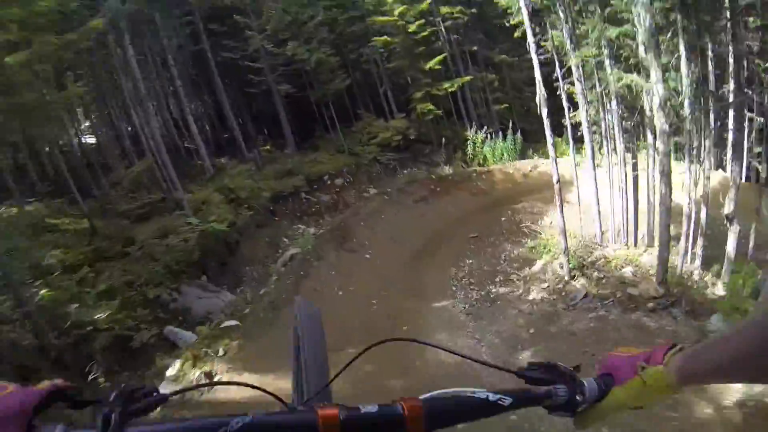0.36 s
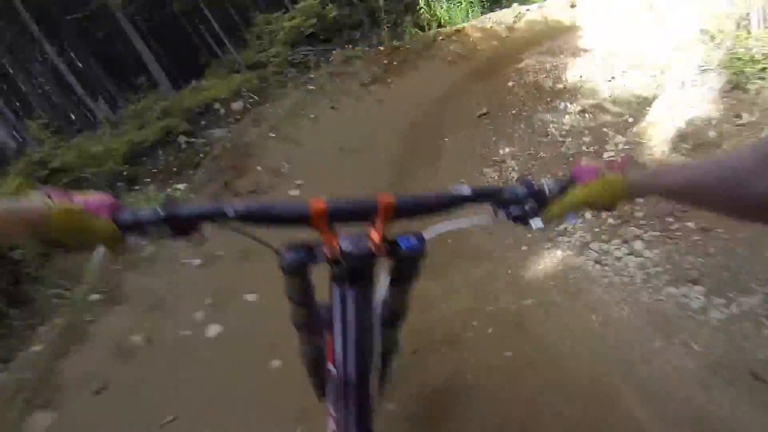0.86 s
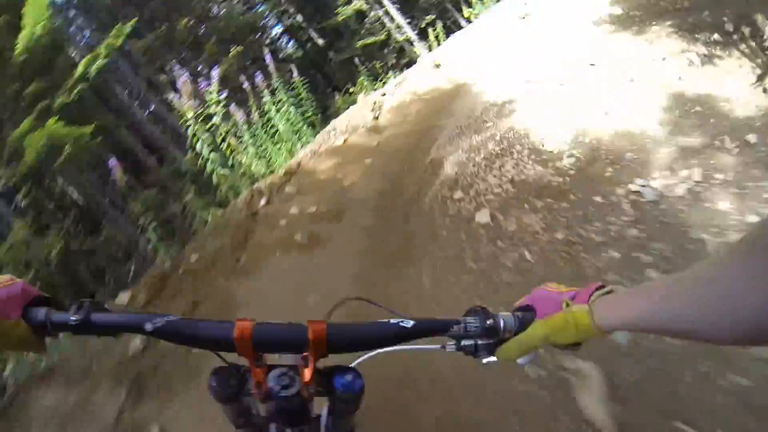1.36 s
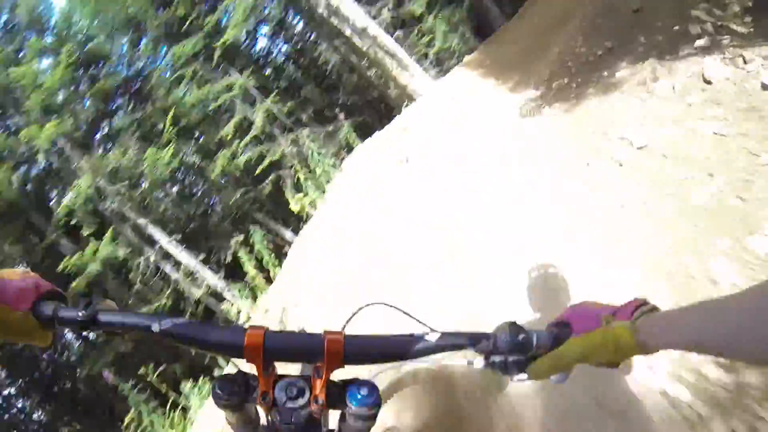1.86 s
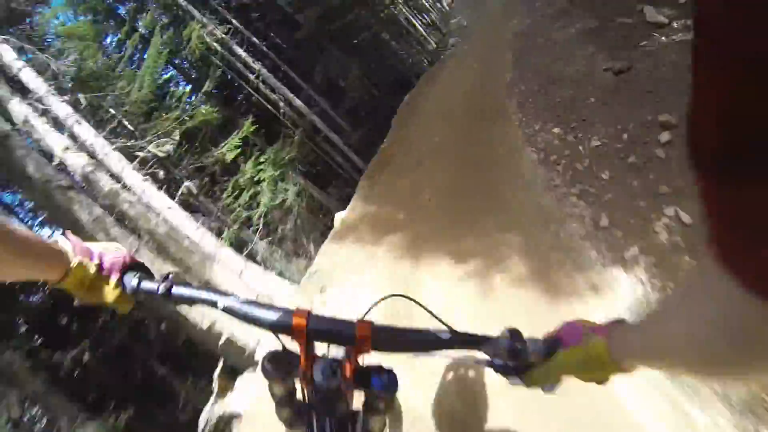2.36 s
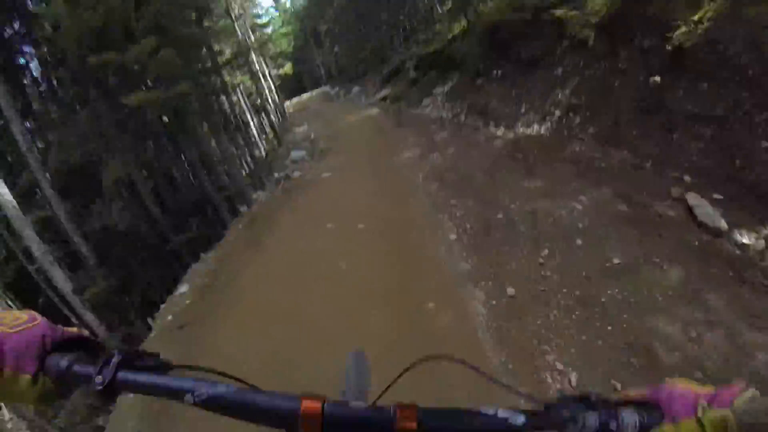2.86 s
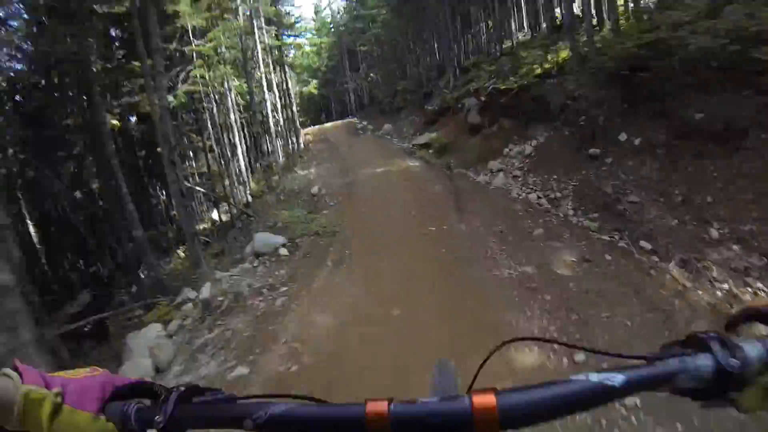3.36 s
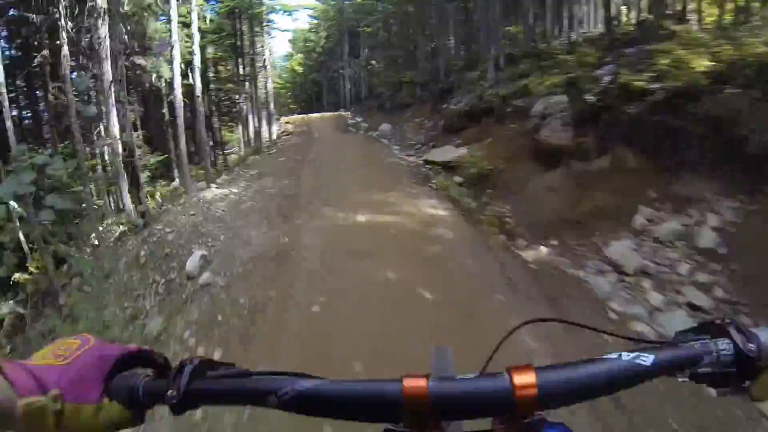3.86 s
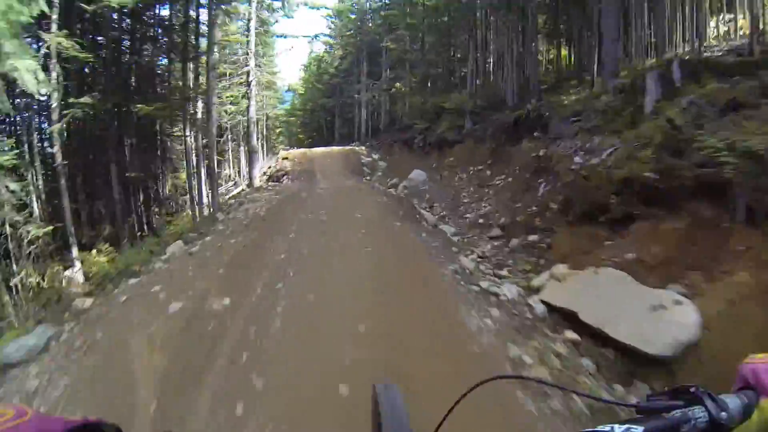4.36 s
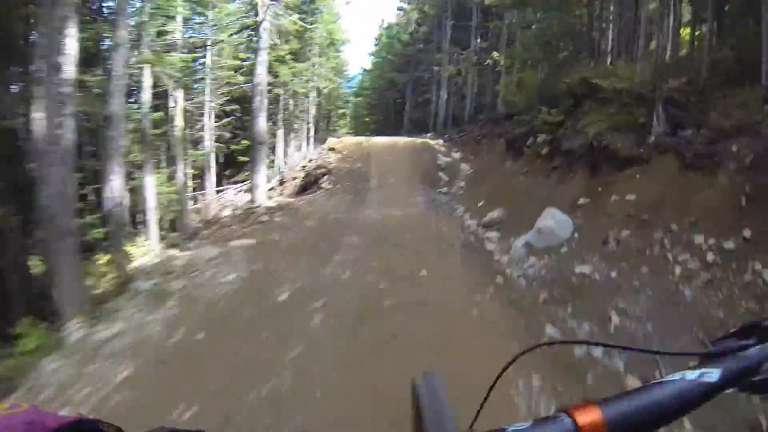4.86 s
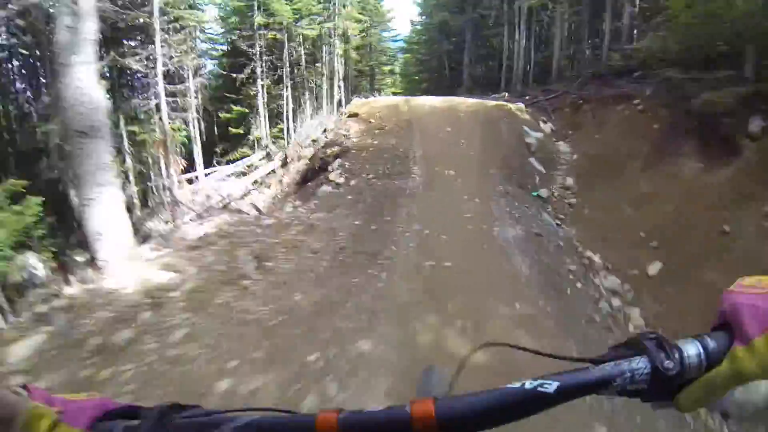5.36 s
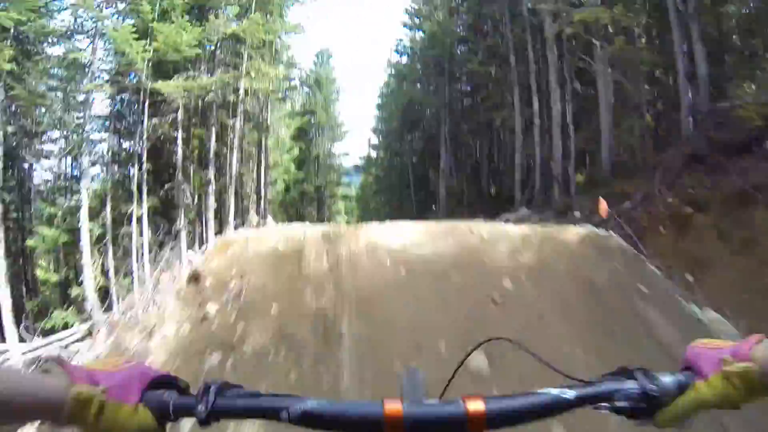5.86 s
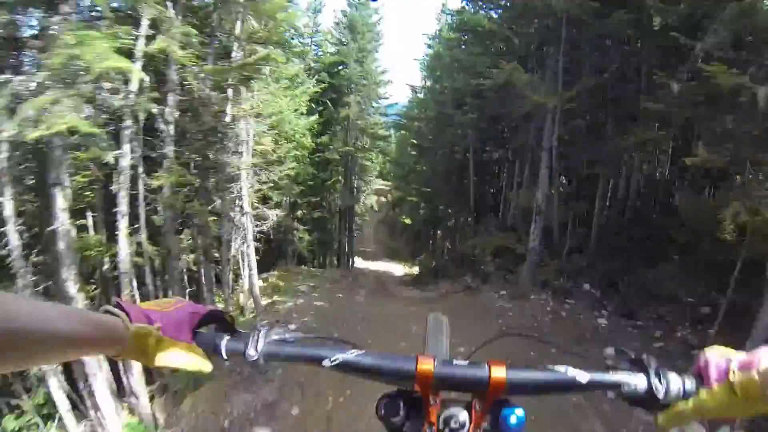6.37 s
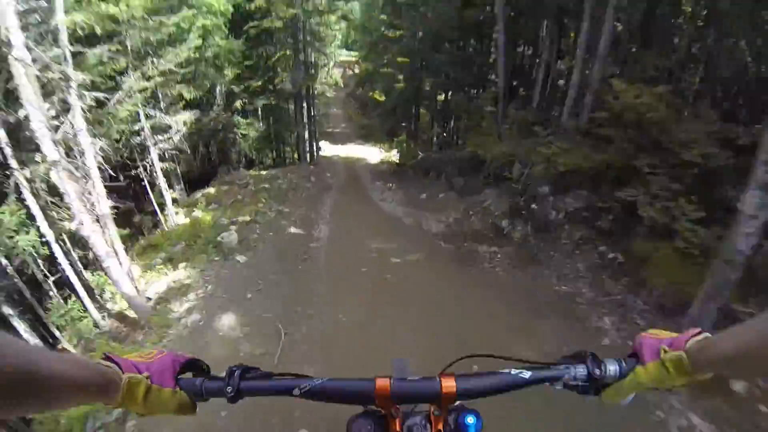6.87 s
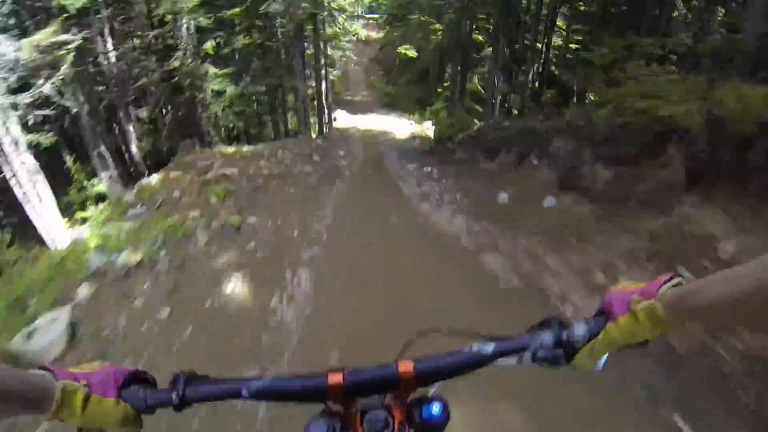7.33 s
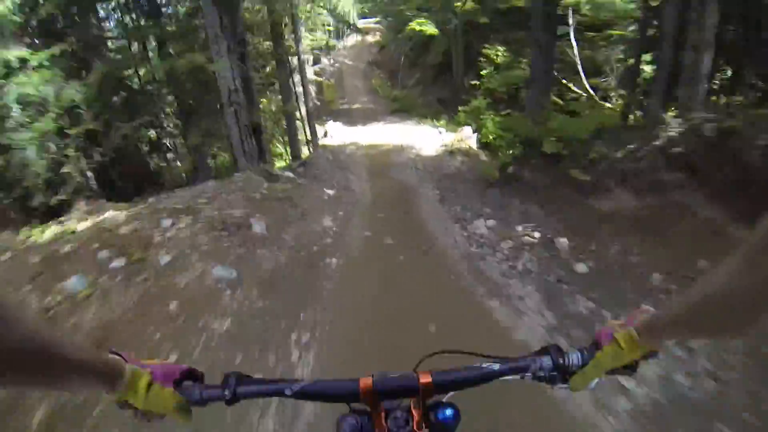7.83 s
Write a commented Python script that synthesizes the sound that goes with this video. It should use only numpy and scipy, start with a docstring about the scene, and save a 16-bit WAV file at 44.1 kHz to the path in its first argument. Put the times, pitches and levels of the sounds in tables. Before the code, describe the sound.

A close, enclosed microphone catches low wind thumps, gritty rolling tyres, a dusty hiss through a turn, clustered frame knocks, then a jump and landing.

```python
"""A mountain bike rolls fast down a dirt trail, heard from a microphone in a sealed case on the rider's chest.
It opens in a jump, in head wind: coloured noise that buffets and thumps the case and rushes past it.
At 0.6 s the wheels land: tyre noise drones, roars and grinds, while frame modes ring to knocks and small stones;
dust hisses in a banked turn, then knocks crowd together near 2.6 s. From 6.3 s a second jump leaves the wind
and dull jerks of the case, damped low tones with a puff; at 7.1 s the bike lands and rolls on."""
import sys
import numpy as np
from scipy import signal
from scipy.fft import rfft, irfft, next_fast_len
from scipy.io import wavfile
from scipy.ndimage import uniform_filter1d, map_coordinates

SR = 44100
rng = np.random.default_rng(int(sys.argv[2]) if len(sys.argv) > 2 else 0)


def pcm_store(signal):
    """Save signal as 16-bit PCM."""
    levels = np.round(np.clip(np.atleast_2d(signal), -1, 1) * 32767)
    wavfile.write(sys.argv[1], SR, levels.astype(np.int16).T)


def voltage_ratio(level):
    """Linear amplitude factor for a level in decibels (scalar or array-like)."""
    return 10 ** (np.asarray(level, float) / 20)


N = 351477  # samples in the scene
SPAN = 2048  # samples given to each short event

# head wind on the case: t/s, buffet level/dB, thump level/dB
WIND = [(0.0, -32, -35), (0.26, -42, -53.5), (0.69, -26.5, -24.5), (1.37, -31.5, -42.5), (1.46, -30, -41),
        (1.93, -29, -33.5), (2.71, -33.5, -40), (3.02, -27.5, -25), (3.55, -34, -41.5), (3.66, -30, -31),
        (3.97, -34, -42), (4.04, -29.5, -32), (4.24, -32.5, -40), (5.35, -29.5, -35.5), (5.44, -22.5, -28),
        (5.51, -34, -42.5), (5.68, -26, -30), (5.7, -35, -33), (6.19, -34.5, -39.5), (6.24, -18.5, -34.5),
        (6.37, -28, -33.5), (6.59, -25.5, -34.5), (6.68, -37.5, -44), (7.06, -33, -34.5),
        (7.81, -27.5, -30), (7.93, -21.5, -31), (7.97, -39, -35)]


def along(points, hz):
    """(Hz, value) points read on a log frequency axis."""
    f, value = np.transpose(points)
    return np.interp(np.log(hz + 1), np.log(f + 1), value)


def unit(x):
    """Scaled to rms 1."""
    return x / np.sqrt(np.mean(x ** 2, axis=-1, keepdims=True) + 1e-20)


def controls(rows):
    """The columns after the time, a value per sample."""
    s, *columns = np.transpose(rows)
    return [np.interp(np.arange(N) / SR, s, column) for column in columns]


def wobble(rate):
    """A smooth random curve, rate knots a second."""
    knots = rng.standard_normal(N // 100 + 9)
    return map_coordinates(knots, [np.arange(N) * rate / SR])


EDDIES = wobble(24)  # quick swells shared by wind and tyres


def rush(spectrum, patchy_db, swell_db):
    """Noise with patches of random gain rides on quick swells, is coloured by source and case, then set to rms 1."""
    # cavity resonances of the case, heard on every rushing sound: f/Hz, width/Hz, lift/dB
    cavity = [(1320, 660, -3), (1920, 160, 3), (3450, 120, -4.5), (3920, 87, -7.5), (3920, 200, 3),
              (9380, 580, 4)]
    z = signal.stft(rng.standard_normal(N), nperseg=512)[2]
    field = uniform_filter1d(rng.standard_normal(z.shape), size=6, axis=0)
    field = uniform_filter1d(field, size=8, axis=1)
    patchy = signal.istft(z * voltage_ratio(patchy_db * field / field.std()), nperseg=512)[1][:N]
    m = next_fast_len(N + SPAN)
    f = np.fft.rfftfreq(m, 1 / SR)
    lift_db = sum(db / (1 + (2 * (f - hz) / width) ** 2) for hz, width, db in cavity)
    coloured = irfft(rfft(patchy * voltage_ratio(swell_db), m) * voltage_ratio(along(spectrum, f) + lift_db), m)
    return unit(coloured[:N])


def wind():
    """Eddies of head wind press on the case: slow buffets, faster thumps, a thin steady rush past its edges."""
    # thin rush past the case, bare in the two jumps, one list for each: t/s, level/dB
    edge_level = [
        [(0.0, -59.5), (0.33, -55.5), (0.54, -51.5)],
        [(6.25, -49.5), (6.604, -51), (6.834, -51), (7.03, -49)],
    ]
    # colour of each layer before the case resonances: f/Hz, relative level/dB
    buffet_colour = [(7.1, -7), (12, -7), (38, 4.5), (110, -7), (140, -10.5), (240, -120)]
    thump_colour = [(41, -36.5), (70, 0), (211, -6.5), (400, -19.5), (520, -36.5), (880, -120)]
    edge_colour = [(260, -21.5), (450, 1.5), (793, -4.5), (867, -2.5), (1320, -10.5), (1910, -13.5),
                   (2900, -26), (4030, -20.5), (4410, -32.5), (6120, -43.5), (9430, -43), (10600, -46.5),
                   (15900, -51.5)]
    buffet_db, thump_db = controls(WIND)
    edge_db = controls(np.concatenate(edge_level))[0]
    buffet = voltage_ratio(buffet_db) * rush(buffet_colour, patchy_db=1.5, swell_db=2.16 * wobble(13))
    thump = voltage_ratio(thump_db) * rush(thump_colour, patchy_db=0.5, swell_db=2.4 * EDDIES + 1.2 * wobble(9))
    edge = voltage_ratio(edge_db) * rush(edge_colour, patchy_db=0.96, swell_db=0.42 * EDDIES)
    return buffet + thump + edge


def jolts():
    """The case jerks on its harness: a dull push of two damped tones and a puff, dying 60 dB in 20 ms."""
    # jerks: t/s, relative level/dB, f/Hz of the lower tone
    jerks = [(0.117, -26, 108), (0.585, -15.5, 107), (0.692, -19, 167), (0.748, -19.5, 218),
             (2.884, -24, 201), (3.03, -19, 137), (4.75, -20, 110), (5.19, -22.5, 98), (5.429, -19, 100),
             (6.274, -23, 103), (6.394, -14.5, 127), (6.504, -22, 131), (6.707, -25, 114),
             (7.294, -22.5, 102), (7.87, -18, 70)]
    out, t = np.zeros(N + SPAN), np.arange(SPAN) / SR
    puff_window = np.hanning(80) / 80 * 2  # smooths noise over 80 samples
    for s, db, hz in jerks:
        push = np.sin(2 * np.pi * hz * t)
        push += 0.36 * np.sin(2 * np.pi * 2.84 * hz * t) * voltage_ratio(-60 * t / 0.05)
        puff = np.convolve(rng.standard_normal(SPAN), puff_window, 'same')  # a dull puff of air
        push += (1 - np.exp(-t / 0.0031)) * 2.7 * puff
        envelope = voltage_ratio(db + 8.5 - 60 * t / 0.02) * (1 - np.exp(-t / 0.0017))
        out[round(s * SR):][:SPAN] += envelope * push
    return out[:N]


def strike(rows, scatter_db, length):
    """Each row is a short scraping contact that rings the frame's modes at new strengths."""
    # what frame and case ring with: f/Hz, width/Hz, relative level/dB
    mode_table = [(470, 1700, -5), (630, 170, 1.5), (828, 200, -1.5), (1228, 74, 2), (1520, 150, -5.5),
                  (1900, 73, -2), (2217, 170, -5.5), (3050, 200, 3.5), (3428, 80, 7.5), (3824, 110, 7.5),
                  (4190, 210, -0.5), (5010, 790, 2.5), (5930, 780, -9.5), (6570, 630, -7), (8770, 300, 14),
                  (9370, 370, 14.5), (11300, 1700, -1.5), (13900, 1500, -1.5), (15400, 1200, -16)]
    blow, blow_t60_s = 2.34, 0.0029  # the hard first touch, over the scrape that follows
    s, db, low_db, mid_db, top_db = np.transpose(rows)[..., None]
    fc, width, mode_db = np.transpose(mode_table)
    t, f = np.arange(SPAN) / SR, np.fft.rfftfreq(SPAN, 1 / SR)[:, None]
    modes = (-1) ** np.arange(len(fc)) * 1j * f * width / (fc ** 2 - f ** 2 + 1j * f * width)
    # each mode is heard only near its own pitch
    modes = modes * 1j * f * fc / (fc ** 2 - f ** 2 + .6j * f * fc)
    t60 = length * voltage_ratio(2.5 * rng.standard_normal((len(s), 1)))
    shape = (len(s), SPAN)
    grain = rng.standard_normal(shape) * np.abs(rng.standard_normal(shape)) * (1 - np.exp(-t / 0.00013))
    strength = voltage_ratio(mode_db + scatter_db * rng.standard_normal((len(s), len(fc))))
    group = np.digitize(fc, [2600, 4800, 7500])  # Hz between the low, middle, 5-7 kHz and top modes
    sound = 0
    for k, group_db in enumerate([low_db, mid_db, 0 * db, top_db]):
        # the higher the modes, the sooner the contact stops feeding them
        scrape = voltage_ratio(-60 * t / (t60 * 0.97 ** k))
        contact = grain * (scrape + blow * voltage_ratio(-60 * t / blow_t60_s))
        ring = irfft(rfft(contact) * (strength * (group == k) @ modes.T), SPAN)
        sound = sound + ring / np.abs(ring).max(axis=1, keepdims=True) * voltage_ratio(db + group_db)
    at = np.round(s * SR).astype(int) + np.arange(SPAN)
    return np.bincount(at.ravel(), sound.ravel(), N + SPAN)[:N]


def knocks():
    """The clearest knocks of chain, stones and cables, whose contacts ring the frame."""
    # knocks before a 1 dB lift: t/s, peak of the modes at 5-7 kHz/dB,
    # then low, middle and top modes relative to that peak/dB
    hits = [(0.6973, -60, 20, 7, -2), (0.7267, -52.5, 21, 6, -9), (0.752, -70, 24, 4, -16),
            (0.7787, -58.5, 13, 18.5, -13), (0.7861, -67, 15, 12, -6), (0.8117, -49.5, 11, 7, -5),
            (0.8372, -50.5, 17.5, 9, -9), (0.918, -68, 18, 19, -5), (0.9219, -57, 16, -7, -4),
            (0.9368, -55.5, 21, 11, -19), (1.2027, -56, 4, 11, -13), (1.3172, -48, 11, 5, -1.5),
            (1.4062, -51, -3, 6, -5), (1.5357, -58, 26.5, -2, -7), (1.5588, -53, 16, 4, -10),
            (1.8305, -48.5, 15, 11, -9), (1.9215, -50, 2, 14.5, -12), (1.949, -50, 17.5, -2, -17),
            (2.1201, -50, 20, 8.5, -15), (2.1484, -53.5, 24, 10, -9), (2.2555, -43.5, -5, -1, -13),
            (2.3446, -59, 12, 18, -18), (2.3667, -49.5, 22, 10, -13), (2.3796, -40, 22.5, 10, -9),
            (2.4024, -45.5, 22, 9, -7), (2.4744, -54, 29, 17.5, -12), (2.4917, -56, 7, 3, -9),
            (2.5103, -49, 10, 4, -13), (2.532, -49, 19, 13, 4), (2.5414, -39.5, 18, -2, -13),
            (2.5491, -35.5, 15.5, 10.5, -14), (2.584, -43, 18, 5, -22), (2.5905, -44, 18, 2, -12),
            (2.6189, -37, 1, -7, -15), (2.6442, -44, 4, -9, -22), (2.6768, -49.5, 24, 3, -15),
            (2.6973, -45.5, 23.5, 15, -10), (2.7077, -45, 20, -3, -10), (2.7262, -43.5, 12.5, 5, -13),
            (2.7398, -41, 22, 7, -13), (2.747, -40, 5, 12, -7), (2.7724, -41, 5, 13.5, -7),
            (2.7814, -44, 14, 2, -10), (2.8089, -51.5, 29, 13, -15), (2.8419, -49, 2, -7, -24),
            (2.8629, -54, 10, 13.5, -13), (2.9502, -48.5, 1, 9, -2), (2.9876, -52, 15, 11, -17),
            (3.0957, -52.5, 10, 8, -1), (3.1272, -42.5, 18.5, 7, -16), (3.1304, -61, 12, 10, -7),
            (3.2022, -68.5, 25, 24.5, -10), (3.292, -45, -2, 8.5, -14), (3.4144, -42, 0, 1.5, -8.5),
            (3.5099, -54.5, 8, 8.5, -27), (3.6711, -52, 8, 3, -8), (4.2235, -46, 13.5, 5, -13),
            (4.315, -46.5, 11, 4, -9), (4.355, -49, 12, 7.5, -5), (4.3767, -51, 4, 1, -4),
            (4.436, -52, 16, 4, -15), (4.5057, -38, -2, -3, -19), (4.5925, -51, 7, 9, -19),
            (4.656, -46, 7, 7.5, -23), (4.7745, -57, 4, 6, -12), (4.8708, -47, 12, 1, -29),
            (4.9215, -46.5, 7.5, -4, -17), (5.0222, -49.5, 2, 7, -5), (5.1054, -57.5, 23.5, 10, -10),
            (5.1486, -50, 0, 5, -6), (5.2001, -52, 12, 4, -17), (5.27, -47, 9, 6, -10),
            (5.2864, -43, 10, 6, -19), (5.3263, -53, 11, 11.5, 1), (5.373, -48, 6, 1, -19),
            (5.445, -60, 8, 12.5, -7), (5.477, -47.5, 4, 11.5, -7), (5.5298, -52, 10, 8, -39),
            (5.5548, -50.5, -1, 10, -7), (5.665, -50.5, 16, 7, -8), (5.694, -61, 13, 10, -4),
            (5.7164, -58, 8, 8, 0), (5.7758, -55, 6, 11, -14), (5.9033, -55, 17, -1, -11),
            (6.0257, -61, 29, 18, -17), (6.0704, -55, 3, 6, -16), (6.2452, -54, 2, -3, -11),
            (7.0662, -52, 18, 14.5, -6), (7.1053, -51, 19, -3, -7), (7.1093, -55.5, 24, -2, -16),
            (7.1307, -45, 20, 1, -11), (7.1577, -38.5, 11, 5, -12), (7.1794, -48.5, 22.5, 14, -13),
            (7.223, -46.5, 15.5, 7, -15), (7.2654, -49.5, 18, 13, -21), (7.3312, -58, 15, 1, -16),
            (7.4849, -57, 13, 11, -16.5), (7.5108, -49, 10, 4, -15), (7.5772, -44, -5, 8.5, -15),
            (7.6046, -51, 9, 7, -11), (7.6214, -57, 24, 15, -14), (7.6545, -57, 6, 6, -16),
            (7.7094, -63, 14, 13.5, -19), (7.7364, -63, 27, 16, -13), (7.7967, -54, 21.5, 9, -16),
            (7.8374, -54.5, 29, 4, -13)]
    return voltage_ratio(1.0) * strike(hits, scatter_db=4.5, length=0.046)


def rings():
    """A chattering contact keeps one mode singing: it swells fast, sags 6 dB over its length and dies."""
    # singing modes: t/s, f/Hz, level before the envelope/dB, length/s
    tones = [(0.783, 3290, -44, 0.019), (2.548, 1950, -35, .022), (2.621, 3370, -34.5, 0.027),
             (2.618, 1234, -35, .016), (2.684, 3800, -39, 0.015), (2.747, 3370, -31.5, 0.017),
             (2.746, 830, -31, .016), (2.776, 1960, -37, 0.018), (3.131, 1208, -36.5, .03),
             (3.133, 1950, -39.5, 0.027), (7.108, 850, -31, 0.011), (7.178, 1980, -35.5, .02),
             (7.836, 697, -30.5, 0.013), (7.838, 1203, -29, 0.011)]
    out, t = np.zeros(N + SPAN), np.arange(SPAN) / SR
    for s, hz, db, length in tones:
        waver = np.cumsum(rng.standard_normal(SPAN)) * .03  # unsteady phase, radians
        fall_db = -6 * t / length - 60 * np.maximum(t - length, 0) / .02
        shape = (1 - np.exp(-t / .002)) * voltage_ratio(fall_db)
        out[round(s * SR):][:SPAN] += voltage_ratio(db) * shape * np.sin(2 * np.pi * hz * t + waver)
    return out[:N]


def rolling():
    """Levels of drone, roar, grind and hiss; they drop away while the wheels are off the ground."""
    # tyres on the ground, one list from each landing to the next take-off:
    # t/s, casing level/dB, grit level/dB
    runs = [
        [(0.56, -66, -85), (0.62, -52, -82.5), (0.72, -51, -73), (0.79, -47, -56.5), (0.89, -58, -67),
         (1.29, -51, -60), (1.85, -47.5, -56.5), (2.3, -52, -58.5), (2.47, -46, -54.5), (2.56, -40.5, -42),
         (2.66, -47.5, -49.5), (2.79, -49, -50), (2.83, -50, -60), (2.91, -53, -61), (3.12, -48, -61),
         (3.48, -59.5, -68.5), (3.68, -50.5, -65), (4.4, -53.5, -62), (4.67, -46.5, -59.5), (4.83, -53, -67.5),
         (4.97, -47, -57), (5.14, -56, -64), (5.36, -49, -57.5), (5.5, -52, -62), (5.97, -41.5, -53.5),
         (6.05, -45.5, -60), (6.11, -51, -51.5), (6.21, -56, -68)],
        [(7.07, -47, -58), (7.116, -48.5, -53.5), (7.24, -50.5, -56.5), (7.53, -49, -60), (7.69, -44.5, -54),
         (7.97, -50.5, -61)],
    ]
    # dust sprays as the tyres slide in the banked turn and leave the lip:
    # start t/s, end t/s, fade/s, added hiss level/dB
    sprays = [(1.247, 2.26, 0.13, 10.5), (6.084, 6.153, .025, 7.5)]
    # the squashed casing drones louder on each touchdown, then recovers: added level/dB, one per landing
    landing_lift = [6, 1]
    landing_s = 0.15  # the lift holds this long and fades as long
    off = (-120, -120)  # dB in the air
    rows = []
    for run in runs:
        rows += [(run[0][0] - .01, *off), *run, (run[-1][0] + .05, *off)]
    casing_db, grit_db = controls(rows)
    spray_db = sum(controls([(a - fade, 0), (a, db), (b, db), (b + fade, 0)])[0] for a, b, fade, db in sprays)
    # the drone follows the casing and, more gently, the wind's thumps
    drone_db = -43 + 0.65 * (casing_db + 50) + 0.28 * (controls(WIND)[1] + 35)
    for run, db in zip(runs, landing_lift):
        down = run[0][0]
        lift = [(down - .1, 0), (down, db), (down + landing_s, db), (down + 2 * landing_s, 0)]
        drone_db += controls(lift)[0]
    hiss_db = -80.5 + 1.2 * (grit_db + 60) + spray_db
    return drone_db, casing_db, grit_db, hiss_db


def tyres():
    """The casing drones, knobs roar on the dirt, grit grinds and hisses under them; the same bumps shake them all."""
    # colour of each layer before the case resonances: f/Hz, relative level/dB
    drone_colour = [(160, -19.5), (280, -8), (323, 1.5), (356, -6), (443, -3), (1000, -12.5), (1300, -34),
                    (2200, -120)]
    roar_colour = [(530, -47.5), (900, -2.5), (1170, 2), (1550, -9), (1960, -8.5), (2130, -10.5),
                   (2800, -22), (3640, -52), (6160, -120)]
    grind_colour = [(1470, -11), (2500, -4), (2740, -5), (3250, -0.5), (3540, -4), (3930, -4),
                    (4430, -11.5), (5130, -19), (6500, -25), (8450, -49), (14300, -120)]
    hiss_colour = [(3240, -38), (5500, -4), (6540, -17), (7150, -8), (7570, -17), (9370, -12.5),
                   (12700, -21), (15100, -17.5), (15900, -29.5)]
    drone_db, roar_db, grind_db, hiss_db = rolling()
    bumps, crunch = wobble(30), wobble(160)
    drone = voltage_ratio(drone_db) * rush(drone_colour, patchy_db=2.2, swell_db=.5 * bumps + crunch + EDDIES)
    roar = voltage_ratio(roar_db) * rush(roar_colour, patchy_db=1.1, swell_db=bumps + 1.8 * crunch)
    grind = voltage_ratio(grind_db + 3.33) * rush(grind_colour, patchy_db=1.5, swell_db=bumps + 2.85 * crunch)
    hiss = voltage_ratio(hiss_db) * rush(hiss_colour, patchy_db=.3, swell_db=bumps + 1.6 * crunch)
    return drone + roar + grind + hiss


def grit():
    """Small stones flung at the frame at random ring its modes; their levels follow the grit under the tyres."""
    chance = rng.random((800, 5))  # 800 stones
    s = chance[:, 0] * (N - 1) / SR
    grit_db = rolling()[2][(s * SR).astype(int)]
    db = grit_db - 9 + 13 * chance[:, 1] ** 4  # few are loud
    colour_db = [3, 5, -9] + chance[:, 2:] * [12, 8, 11]  # low, middle and top modes
    return strike(np.column_stack([s, db, colour_db]), scatter_db=1.0, length=0.017)


def scene():
    """Wind, tyres and knocks, all close to the one microphone."""
    return (wind() + jolts() + knocks() + rings() + tyres() + grit())[None]


def roll_off(x):
    """The treble ends steeply here."""
    return signal.sosfilt(signal.butter(12, 16040, fs=SR, output="sos"), x)


def record(dry):
    """The microphone stage rounds off the strongest buffets, bending towards a ceiling of 0.49."""
    rounded = dry / (1 + np.abs(dry / 0.49) ** 3) ** (1 / 3)
    return roll_off(rounded)


dry = scene()
out = record(dry)
pcm_store(out)
```